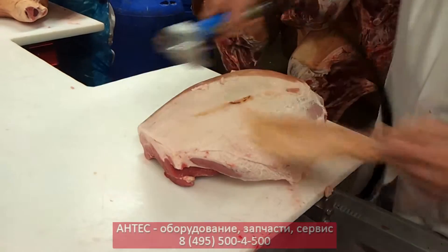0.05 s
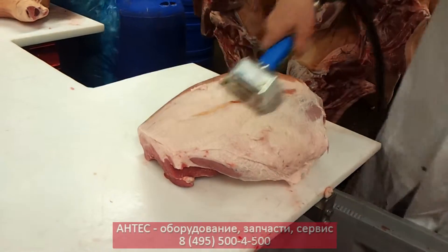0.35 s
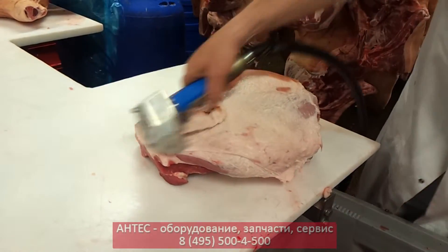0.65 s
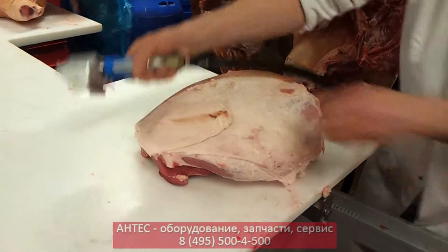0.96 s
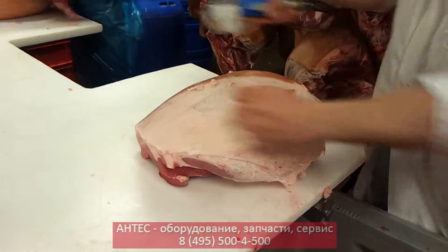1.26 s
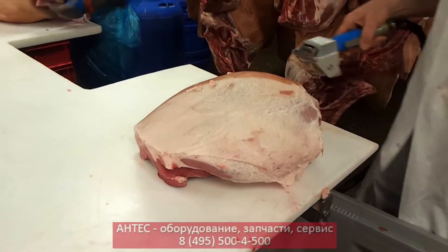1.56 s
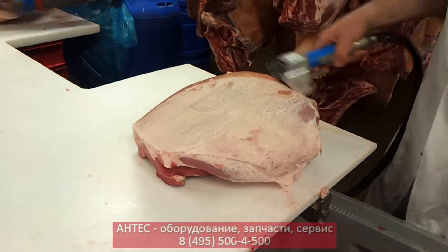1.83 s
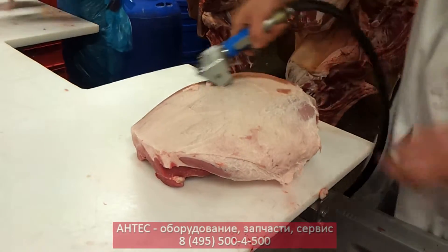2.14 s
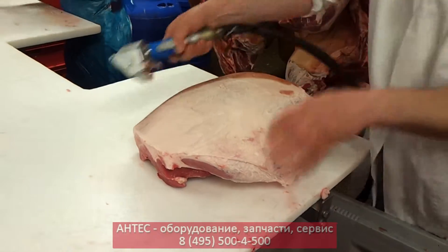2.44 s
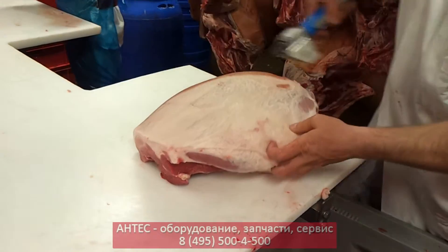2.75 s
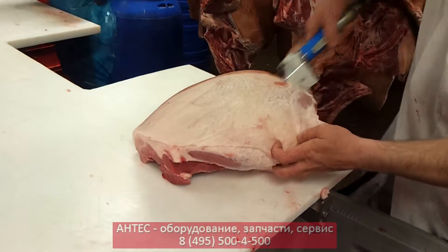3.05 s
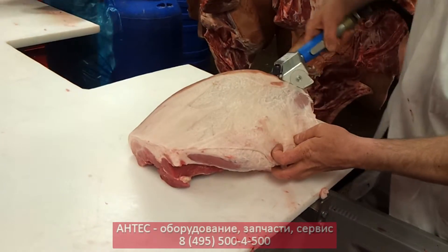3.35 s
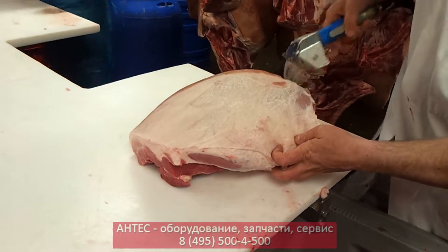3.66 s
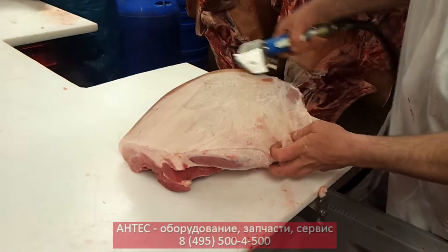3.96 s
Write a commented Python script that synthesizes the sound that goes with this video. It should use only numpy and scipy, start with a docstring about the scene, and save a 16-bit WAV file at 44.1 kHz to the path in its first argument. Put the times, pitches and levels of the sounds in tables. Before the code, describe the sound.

A pneumatic meat trimmer runs nearby with a high whine and rushing air, slowing with a rasp, then holding speed. Short whistles, three air spurts and dull knocks on a table follow before it slows again in the rumbling workroom.

```python
"""A hard-walled workroom: a handheld meat trimmer runs over a cutting table, sagging twice in speed.
Its five-vane rotor whines, a gear sings beside it, and air hisses, whistles and spurts from the tool
as it is swung; an overtone of the whine falls in the last sag. Behind are rumble, a flickering low noise
band and two hums. Something bumps the table at the start and near the end.
The recorder ducks and clips on the spurts."""
import sys
import numpy as np
from scipy import signal
from scipy.fft import rfft, irfft
from scipy.io import wavfile
from scipy.ndimage import uniform_filter1d

SR = 44100
rng = np.random.default_rng(int(sys.argv[2]) if len(sys.argv) > 2 else 0)


def inscribe(sig):
    """Save sig as 16-bit PCM at rate SR to the path in sys.argv[1].

    A 1-D sig is mono; a 2-D sig holds one channel per row.
    Samples are clipped to [-1, 1] before scaling.
    """
    pcm = np.round(np.clip(np.atleast_2d(sig).T, -1, 1) * 32767)
    wavfile.write(sys.argv[1], SR, pcm.astype(np.int16))


N = 176400
T = np.arange(N) / SR
BINS_HZ = np.fft.rfftfreq(N, 1 / SR)


def amp(db):
    return 10 ** (np.asarray(db) / 20)


def curve(rows):
    """Linear interpolation of (t/s, value) rows."""
    return np.interp(T, *np.array(rows).T)


def unit(x):
    """Scale to rms 1."""
    return x / np.sqrt(np.mean(x ** 2))


def pan(db):
    """Constant-power gains; db is left minus right."""
    return unit(amp([[db / 2], [-db / 2]]))


def phase_of(hz):
    return 2 * np.pi * np.cumsum(hz * np.ones(N)) / SR


def noise(spectrum, skirt_db_per_oct=18):
    """Uncorrelated stereo noise, rolled off below the spectrum's first row."""
    hz, db = np.array(spectrum).T
    octave = np.log2(BINS_HZ + 1)
    skirt_db = skirt_db_per_oct * np.maximum(np.log2(hz[0]) - octave, 0)
    gain = amp(np.interp(octave, np.log2(hz), db) - skirt_db)
    return unit(irfft(rfft(rng.standard_normal((2, N))) * gain, N))


def drift(hz):
    """Smooth random signal, rms 1, bandwidth about hz."""
    return unit(irfft(rfft(rng.standard_normal(N)) * np.exp(-.5 * (BINS_HZ / hz) ** 2), N))


def burst(start_s, rise_s, hold_s, decay_s):
    """Linear attack, hold, exponential release."""
    attack = np.clip((T - start_s) / rise_s, 0, 1)
    return attack * np.exp(-np.maximum(T - start_s - rise_s - hold_s, 0) / decay_s)


# vane-pass rate: t/s, f/Hz
VANE_RATE = [(0,1258),(.18,1170),(.3,1166),(.325,1071),(.52,888),(.62,1040),(.71,1135),(.78,1331),(.86,1348),(1.3,1326),(1.55,1298),(1.77,1309),(1.8,1282),(1.93,1310),(2.17,1290),(2.42,1340),(2.63,1323),(2.71,1284),(2.87,1267),(3,1302),(3.3,1308),(3.5,1287),(3.71,1292),(3.75,1252),(3.84,1262),(3.9,1170),(3.93,1050),(4,1015)]
VANES, GEAR_ORDER, STROKE_ORDER = 5, 52 / 21, 1 / 21  # order = multiple of the vane rate

def drive(smooth_above_hz=1230):
    """Vane phase and sag (share of speed lost); the rotor jitters more as it labours."""
    hz = curve(VANE_RATE)
    sag = np.maximum(1 - hz / smooth_above_hz, 0)
    jitter = .0012 * drift(29.7) + .0404 * sag * drift(78.7)
    return phase_of(hz * (1 + jitter)), sag


# vane harmonics 1-3 as the tool turns: t/s, level/dB
HARMONIC_1 = [(0,-18.5),(.14,-29.5),(.4,-37),(.65,-24),(1,-23),(1.09,-16.5),(1.35,-18.5),(1.42,-29.5),(1.79,-25),(1.84,-25),(1.89,-29),(2.18,-22.5),(2.25,-20.5),(2.6,-19),(2.69,-29),(3.73,-30),(3.79,-21),(4,-24.5)]
HARMONIC_2 = [(0,-22),(.3,-19.5),(.33,-41),(.69,-22.5),(.77,-16.5),(1.33,-21.5),(1.39,-14.5),(1.79,-22.5),(2.2,-30.5),(2.27,-19),(2.46,-23.5),(2.5,-30),(2.54,-16),(3.02,-21),(3.07,-29),(3.32,-28),(3.43,-15),(3.68,-14.5),(3.74,-32),(4,-29)]
HARMONIC_3 = [(0,-22),(.1,-14),(.295,-14.5),(.325,-24),(.57,-26.5),(.64,-18),(.94,-21.5),(1,-12),(1.06,-23),(1.42,-21),(1.76,-18),(1.84,-13.5),(2.16,-14),(2.22,-21),(2.88,-22),(3,-17),(3.22,-12),(3.27,-20),(4,-18.5)]
# weak shaft harmonics, parallel lists: order; level/dB
WEAK_ORDERS = np.array([9, 12, 14, 20, 25, 30, 35, 40, 45, 50]) / 5
WEAK_DB = [-35,-31.5,-34,-32,-35,-38,-34,-30.5,-34,-33]
# position of the partials: f/Hz, left minus right/dB
PARTIAL_PAN = [(1300,-0.5),(2600,-7),(3900,-5.5),(5300,-24),(8000,22),(11000,22.5)]

def rotor(phase, sag, full_load_sag=.14, flutter_db=2.59, growl_db=6):
    """Whine of the vanes and shaft; under load it stutters, growls, dulls and rasps."""
    partials = [(1, curve(HARMONIC_1)), (2, curve(HARMONIC_2)), (3, curve(HARMONIC_3))]
    partials += zip(WEAK_ORDERS, WEAK_DB)
    mean_hz = np.mean(curve(VANE_RATE))
    load = np.minimum(sag / full_load_sag, 1)
    stutter_db = 3.5 * load ** 2 * drift(33)
    stereo_rad = np.array([[0], [1.5]])
    whine = 0
    for order, db in partials:
        side = pan(np.interp(order * mean_hz, *np.array(PARTIAL_PAN).T))
        level_db = db + stutter_db + flutter_db * np.array([drift(25), drift(13)])
        if order > 5:
            level_db += 3 * drift(9) - 25 * sag  # treble flickers, fades with sag
        elif order >= 4:
            level_db += growl_db * load
        whine += side * amp(level_db) * np.sin(order * phase + stereo_rad)
    rasp = 1 + .23 * load ** 2 * np.cos(phase / VANES + drift(60))  # once per turn
    return np.sqrt(2) * whine * rasp


# gear mesh: t/s, level/dB
GEAR_LEVEL = [(0,-37),(.85,-22.5),(1,-31),(1.24,-18),(1.4,-23.5),(2.3,-31),(2.63,-21),(3.4,-31),(3.65,-20.5),(3.8,-46)]

def gear(phase, wobble_rad=.15, rough_rad=.93):
    """Mesh tone, wobbling in pitch and level with each blade stroke."""
    stroke = STROKE_ORDER * phase
    mesh = np.sin(GEAR_ORDER * phase + wobble_rad * np.sin(stroke) + rough_rad * drift(116))
    pulsing = 1 + .5 * np.cos(stroke) + .5 * np.sin(2 * stroke)
    return np.sqrt(2) * pan(-7) * amp(curve(GEAR_LEVEL)) * mesh * pulsing


# treble exhaust envelope: t/s, level/dB
HISS_LEVEL = [(0,-18),(.09,-14),(.4,-14),(.78,-22),(1.05,-19.5),(1.9,-20.5),(2.1,-16),(2.35,-20.5),(2.6,-20.5),(2.7,-14),(3.22,-16),(3.38,-21),(3.76,-16.5),(4,-21)]
# its spectrum: f/Hz, level/dB
HISS_SPECTRUM = [(2500,-35),(5000,-5.5),(8500,-0.5),(10000,3.5),(11800,-1.5),(14500,-5.5)]
# air spurts: t/s, level/dB
AIR_SPURTS = [(2.784,-10.5),(3.238,-7),(3.693,-10)]

def exhaust_hiss(phase, trim_db=-1):
    """Treble air noise with sharp spurts, lightly chopped by the blade stroke."""
    flow = amp(curve(HISS_LEVEL) + trim_db + .5 * drift(12))
    spurts = sum(amp(db) * burst(s, rise_s=.0026, hold_s=.0078, decay_s=.02) for s, db in AIR_SPURTS)
    chop = 1 + .04 * np.cos(STROKE_ORDER * phase)
    flicker = amp(1.13 * drift(240))
    return pan(15) * noise(HISS_SPECTRUM) * np.hypot(flow, spurts) * chop * flicker


# exhaust envelopes, upper-mid rush and lower-mid churn: t/s, level/dB
RUSH_LEVEL = [(0,-21),(.6,-16),(.8,-23.5),(1.28,-24),(1.45,-20),(2.15,-19),(2.35,-23.5),(2.6,-21.5),(2.68,-17),(3.33,-19.5),(4,-21)]
CHURN_LEVEL = [(0,-19),(.25,-24.5),(.8,-26),(1.15,-22),(3,-21),(4,-19.5)]
# their spectra: f/Hz, level/dB
RUSH_SPECTRUM = [(2200,-31.5),(3200,-4),(4300,4),(5300,3),(6100,-6),(8000,-12.5),(10000,-26)]
CHURN_SPECTRUM = [(500,-12.5),(1200,4),(2200,5.5),(3150,12),(3900,9.5),(4800,-13),(7000,-45)]

def exhaust_rush(phase, rush_trim_db=-1.5, churn_trim_db=2, waver_db=.9):
    """Two midrange bands of air noise, chopped by the vanes."""
    rush = noise(RUSH_SPECTRUM) * amp(curve(RUSH_LEVEL) + rush_trim_db + waver_db * drift(12))
    churn = noise(CHURN_SPECTRUM) * amp(curve(CHURN_LEVEL) + churn_trim_db + waver_db * drift(12))
    chop = 1 + .1 * np.cos(phase)
    return chop * (pan(-8.5) * rush + pan(-5) * churn)


def band(hz, width_hz):
    """Narrow noise band around hz."""
    phase = phase_of(hz)
    return unit(drift(width_hz / 2) * np.cos(phase) + drift(width_hz / 2) * np.sin(phase))


# workroom rumble: f/Hz, level/dB
RUMBLE_SPECTRUM = [(70,-40),(115,-1),(180,5.5),(620,11),(900,5.5),(2000,-9),(6000,-8)]
# low noise band, then two hums: f/Hz, width/Hz, level/dB
NARROW_BANDS = [(160.6,96,-43.5),(620,14,-38),(1785,37,-37.5)]

def background(rumble_db=-26.5, swell_db=.85):
    """Workroom rumble, a flickering noise band near 160 Hz and two hums."""
    rumble = noise(RUMBLE_SPECTRUM)
    rumble = unit(rumble - .5 * rumble[::-1])  # channels largely in antiphase
    rumble *= amp(rumble_db + swell_db * drift(5.3))
    bands = sum(amp(db) * np.array([band(hz, width), band(hz, width)]) for hz, width, db in NARROW_BANDS)
    return pan(5.5) * rumble + bands


# blows on the table: t/s, level/dB, low-pass f/Hz
TABLE_BUMPS = [(.005,-22.5,1200),(3.265,-25.5,350),(3.292,-15,1500),(3.409,-26.5,336)]
# spectrum before the low-pass: f/Hz, level/dB
BUMP_SPECTRUM = [(150,-7),(450,-5.5),(1600,-5),(4000,-11)]

def bumps():
    """Dull blows on the table: noise bursts with a room-like decay."""
    out = 0
    for start_s, db, cutoff_hz in TABLE_BUMPS:
        thud = signal.sosfilt(signal.butter(2, cutoff_hz, fs=SR, output="sos"), noise(BUMP_SPECTRUM))
        out += amp(db) * unit(thud) * burst(start_s, rise_s=.0057, hold_s=.0075, decay_s=.064)
    return pan(4.9) * out


# whistles, last row a rotor overtone: t/s, length/s, start f/Hz, end f/Hz, level/dB
GLIDES = [(1.37,0.15,4350,4710,-25.5),(1.48,.16,5725,5640,-20),(1.609,.19,5660,5100,-27.5),(1.986,0.12,5220,5940,-28.5),(2.15,0.12,6160,5980,-25.5),(2.61,.068,4450,4860,-26),(3.875,0.061,4800,4220,-24)]

def glides(waver_hz=35.1):
    """Brief wavering tones: six whistles, then a falling overtone of the whine as the rotor slows."""
    out = 0
    for start_s, length_s, start_hz, end_hz, db in GLIDES:
        hz = curve([(start_s, start_hz), (start_s + length_s, end_hz)]) + waver_hz * drift(65)
        envelope = burst(start_s, rise_s=.019, hold_s=max(length_s - .04, 0), decay_s=.015)
        out += amp(db) * envelope * unit(np.sin(phase_of(hz)))
    return pan(-6) * out


def room(direct, t60_s=.49, wet_db=-7, predelay_s=.004):
    """Direct sound plus the diffuse ring of tiled walls."""
    t = T[:SR // 2]
    tail = rng.standard_normal((2, len(t))) * amp(-60 * t / t60_s) * (t > predelay_s)
    tail /= np.sqrt(np.sum(tail ** 2, axis=1, keepdims=True))
    ring = signal.fftconvolve(direct, tail, axes=1)[:, :N]
    return (direct + amp(wet_db) * ring) / np.hypot(1, amp(wet_db))


def scene():
    """One drive turns rotor and gear and chops the exhaust; the tool's tones ring in the room."""
    phase, sag = drive()
    tones = rotor(phase, sag) + gear(phase) + glides()
    return room(tones) + exhaust_hiss(phase) + exhaust_rush(phase) + background() + bumps()


def record(dry, low_cut_hz=224, limit_db=-3, window_s=.023, top_cut_hz=14560):
    """Low cut, fast rms limiter, clipping at full scale, top cut."""
    thin = signal.sosfilt(signal.butter(3, low_cut_hz, "high", fs=SR, output="sos"), dry)
    power = np.max(thin ** 2, axis=0)
    rms = np.sqrt(uniform_filter1d(power, int(window_s * SR)) + 1e-12)
    duck = np.minimum(1, amp(limit_db) / rms)
    clipped = np.clip(thin * duck, -1, 1)
    return signal.sosfilt(signal.ellip(12, .1, 60, top_cut_hz, fs=SR, output="sos"), clipped)


dry = scene()
out = record(dry)
inscribe(out)
```